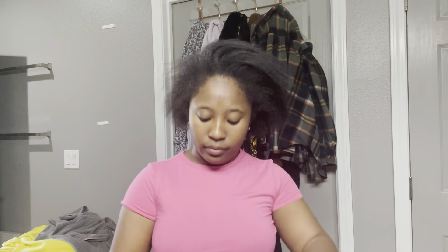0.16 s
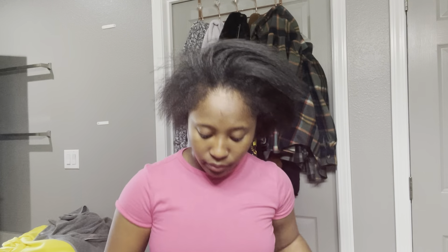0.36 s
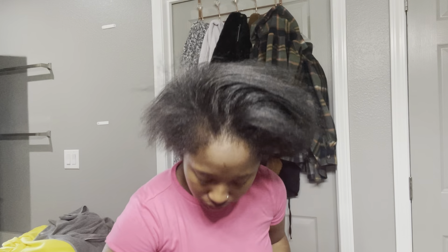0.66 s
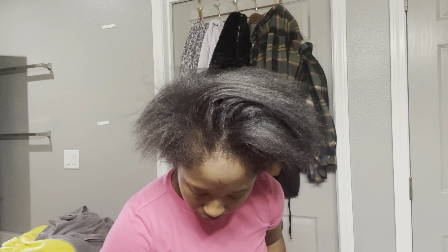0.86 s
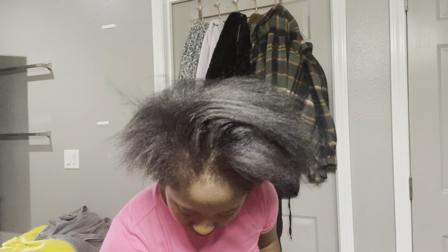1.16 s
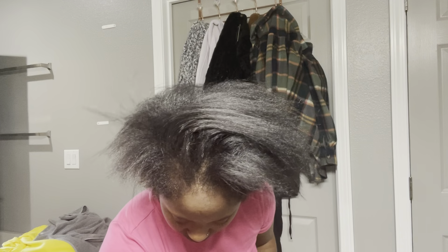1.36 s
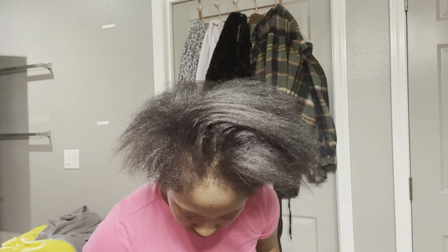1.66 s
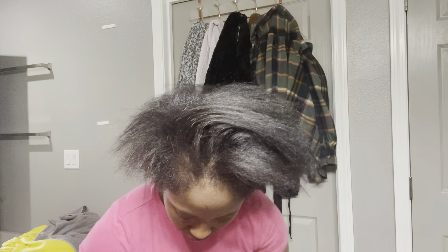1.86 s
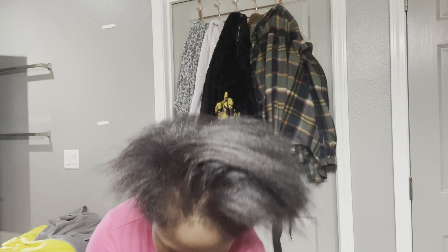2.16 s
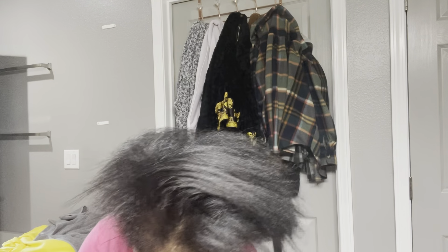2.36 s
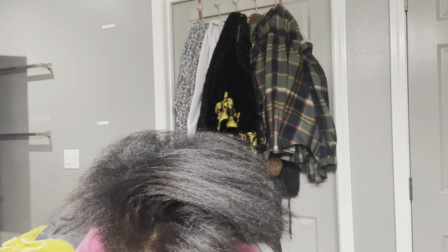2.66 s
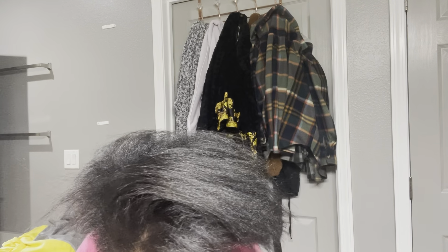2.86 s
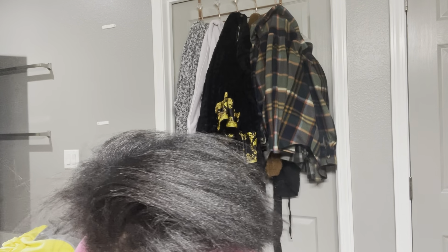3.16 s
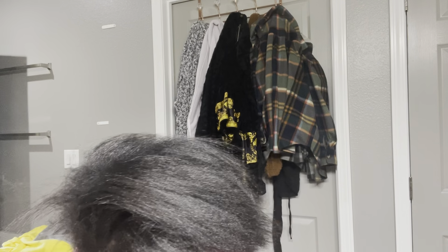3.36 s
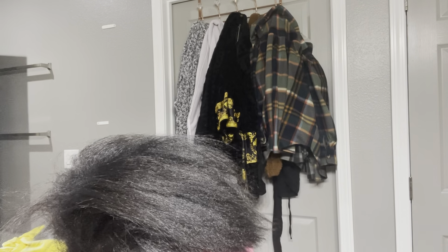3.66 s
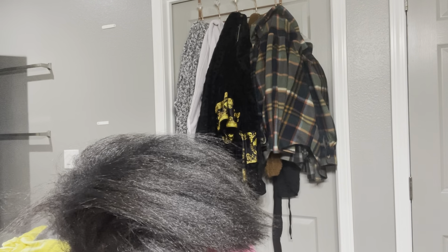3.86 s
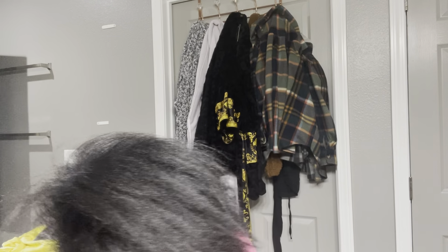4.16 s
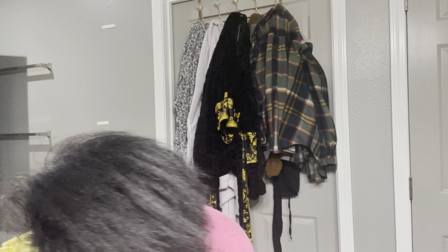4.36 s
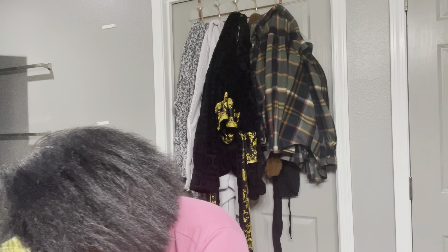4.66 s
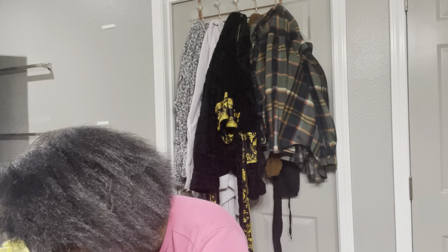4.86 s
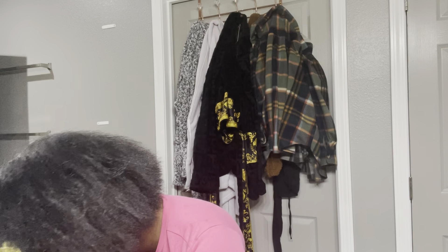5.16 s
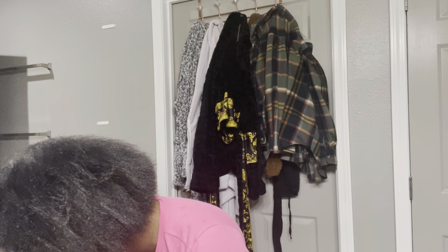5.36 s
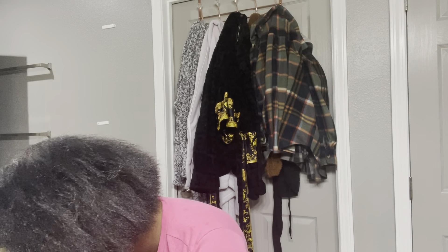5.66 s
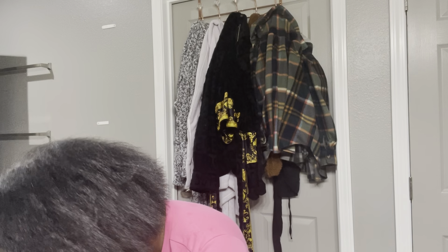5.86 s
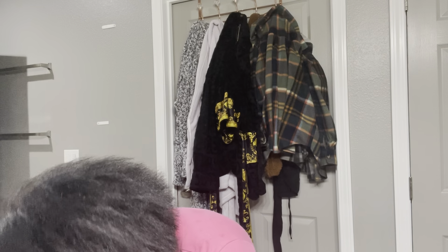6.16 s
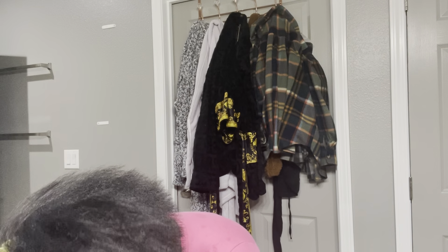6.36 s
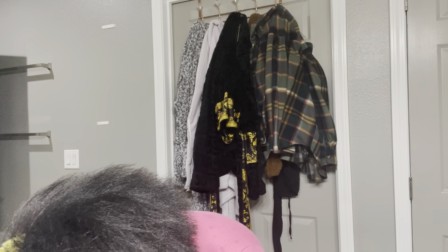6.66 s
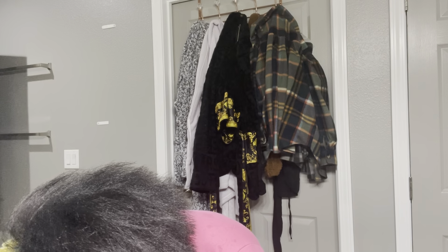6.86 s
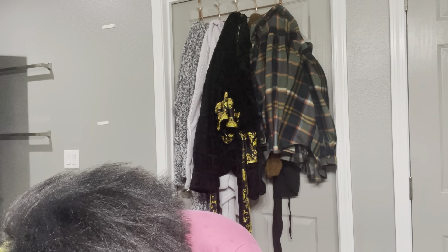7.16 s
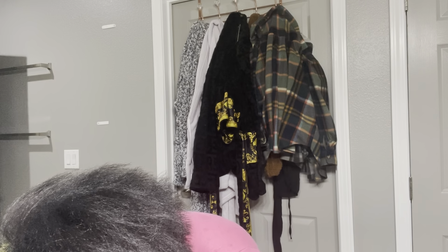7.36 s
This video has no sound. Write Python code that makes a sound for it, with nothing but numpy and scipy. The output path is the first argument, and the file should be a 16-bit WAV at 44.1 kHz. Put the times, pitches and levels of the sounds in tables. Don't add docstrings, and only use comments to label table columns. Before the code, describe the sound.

Indoor handling noise, heard close on a phone: padded bumps, hard plastic clacks, tiny clip ticks, and gritty dragging along a shelf. It starts sparse and quiet, grows busier with a bright knock and a flurry of rattles, thins out, then a hollow object falls with a rapid triple bang. Lighter knocks, crisp clicks and rustling continue to the end over faint building rumble and hiss.

```python
import sys
import numpy as np
from scipy import signal
from scipy.fft import rfft, irfft
from scipy.io import wavfile
from scipy.ndimage import uniform_filter1d

SR = 44100
rng = np.random.default_rng(int(sys.argv[2]) if len(sys.argv) > 2 else 0)


def inscribe(sig):
    pcm = np.round(np.clip(np.atleast_2d(sig).T, -1, 1) * 32767)
    wavfile.write(sys.argv[1], SR, pcm.astype(np.int16))


def elevation(decibels):
    levels = np.asarray(decibels, float)
    return 10 ** (levels / 20)


N = 330750


def evened(x):
    return x / np.sqrt(np.mean(x ** 2) + 1e-20)


def read(points, hz):
    f, value = np.transpose(points)
    return np.interp(np.log(hz + 1), np.log(f + 1), value)


def add(mix, s, sound):
    part = mix[round(s * SR):][:len(sound)]
    part += sound[:len(part)]


# start in seconds, body peak in dB, thud in dB re body, brightness in dB.
BUMPS = [(.554, -48.5, -1, 6.5), (1.252, -40, 3.5, -13), (2.198, -35.5, -10, 3.5), (2.276, -33, -16, 2),
         (3.127, -38.5, 4.5, -2.5), (3.272, -55, -8, -1), (3.496, -35, -19, -2), (4.547, -44, -29, -5),
         (5.041, -43, 7.5, -16), (5.072, -43, 9, -7), (5.098, -38.5, 1, -3), (5.968, -19.5, -3, -3.5),
         (6.274, -36, -3, 3.5), (6.913, -40, 7, 0.5), (6.971, -34.5, -20, -6.5), (7.03, -27.5, -1, -2.5),
         (7.235, -29.5, -25, -12.5)]
# start in seconds, body peak in dB, thud in dB re body, brightness in dB.
CLACKS = [(.653, -45.5, -17, -6), (.729, -23.5, -48, -11), (2.049, -35.5, -2.5, 0.5), (2.41, -45, -17, 6.5),
          (2.45, -17.5, -13, -11.5), (2.484, -28, -33, -4), (3.293, -41, 11.5, 3), (3.337, -28, -2.5, -9),
          (3.398, -25.5, -16, -5.5), (3.479, -43, -12, 9), (3.541, -37, 4, -5), (3.585, -32.5, 6, 3),
          (4.003, -48.5, -28, 4), (4.134, -41, -5, -1.5), (4.183, -33.5, 1, 2), (4.379, -47, -23, -19),
          (4.753, -35, 0, -33), (4.768, -30.5, 1.5, -65), (4.856, -45, 0, 3.5), (4.878, -37.5, 9.5, 2.5),
          (5.312, -36.5, 1, -13), (5.343, -54, 10, -29), (5.907, -41, 9.5, -9.5), (6.266, -41, 14, 4.5),
          (6.315, -34, -30, 0), (6.346, -34.5, 3, 2.5), (6.999, -39, -17, 1), (7.079, -31, -5, -3),
          (7.209, -40, -21, -2)]
# start in seconds, body peak in dB, thud in dB, brightness in dB.
TICKS = [(.517, -43.5, 7.5, 3.5), (.699, -49, 10, -1), (.805, -39, -45, -11), (1.644, -56, 20, -4),
         (2.158, -36.5, -4, 4), (2.397, -43.5, 4, 4.5), (2.641, -43, 8.5, -12), (2.769, -54, -21, 14),
         (2.882, -56, 11, 18), (3.1, -73, 12, -14), (3.67, -24, 0, 3), (4.058, -49.5, -1, 6.5),
         (4.159, -49, 13, 10), (4.456, -52, 16, 13), (5.95, -25.5, -51, 0.5), (6.394, -36.5, 10, -3),
         (6.419, -29, -20, 4), (6.478, -25.5, 0, 0), (6.701, -39, 2, 9), (6.734, -30, -15, -4.5),
         (6.879, -43.5, 3, 1.5), (7.427, -51.5, -45, 2.5)]
# start in seconds, body peak in dB, thud in dB re body, brightness in dB.
DROP = [
    (5.362, -28.5, 14, -23),
    (5.391, -9.5, 0.5, -13),
    (5.455, -10.5, -33, -13),
    (5.483, -11.5, 5, -4.5),
    (5.545, -30, 7, -26),
]


def blows():
    kinds = ((BUMPS, 0, -9.5, 0.37), (CLACKS, 0, -3.5, 0.54), (TICKS, -7.5, 0, 0.46), (DROP, 0, -10, 0.58))
    found = []
    for rows, clack, tick, near in kinds:
        for s, db, thud, bright in rows:
            found.append((s, db, thud, bright + clack, bright + tick, near))
    return sorted(found)


CONTACT_S = [0.014, 0.011, 0.0004, 0.0033]
LATE_S = [0.0024, -.0015, -.0003, .0006]
NEAR_DB = [-14, -13.5, -9, -9.5]


def knocks():
    drive = np.zeros((2, 3, 4, N))
    events, t = blows(), np.arange(1500) / SR
    chance = rng.standard_normal((len(events), 4, len(t)))
    for k, (s, db, thud, clack, tick, near) in enumerate(events):
        for b, rel_db in enumerate((thud, 0, clack, tick)):
            blow = chance[k, b] * np.exp(-t / CONTACT_S[b])
            blow[0] = 1.18 * np.linalg.norm(blow)
            blow *= elevation(db + rel_db - 8.5) / np.linalg.norm(blow)
            add(drive[0, k % 3, b], s + LATE_S[b], elevation(20.0 * near + NEAR_DB[b]) * blow)
            add(drive[1, k % 3, b], s + LATE_S[b], blow)
    return drive


# start in seconds, clack in dB, tick in dB.
SNAPS = [(0.516, -54, -61), (1.257, -60, -66), (1.45, -56, -70), (2.057, -36, -54), (2.075, -42, -56),
         (2.162, -40, -36), (2.2, -51, -47), (2.277, -35, -43), (2.292, -50, -52), (2.345, -43, -58),
         (2.772, -68, -36), (2.883, -48, -57), (3.102, -68, -48), (3.281, -44, -60), (3.295, -52, -45),
         (3.324, -44, -52), (3.342, -38, -46), (3.369, -32, -46), (3.496, -34, -52), (3.535, -28, -51),
         (3.545, -39, -38), (3.569, -40, -44), (3.587, -37, -42), (3.61, -43, -59), (3.672, -26, -28),
         (5.395, -19, -36), (5.457, -21, -34), (5.484, -19.5, -45), (5.488, -17.5, -31), (5.499, -26, -47),
         (5.511, -32, -48), (5.951, -38, -44), (6.274, -42, -41), (6.317, -48, -52), (6.349, -42, -35),
         (6.414, -48, -24), (6.422, -35, -27), (6.432, -29, -46), (6.441, -28, -44), (6.634, -39, -56),
         (6.703, -47, -40), (6.722, -50, -52), (6.74, -40, -50), (6.953, -49, -61), (7.0, -49, -50),
         (7.036, -45, -44), (7.082, -41, -48), (7.237, -33.5, -55)]


def snaps():
    drive = np.zeros((2, 3, 4, N))
    path_db = [-14, -12.5]
    for k, (s, clack_db, tick_db) in enumerate(SNAPS):
        drive[:, k % 3, 2:, round(s * SR)] = elevation(np.add.outer(path_db, [clack_db, tick_db]))
    return drive


def rattles(clicks):
    direct_db, chatter_s = 16, 0.0024
    out, t = np.zeros((2, 2, N)), np.arange(600) / SR
    swell = t / chatter_s * np.exp(-2 * t / chatter_s)
    chance = rng.standard_normal((len(SNAPS), 2, len(t)))
    for (s, clack_db, tick_db), chatter in zip(SNAPS, chance):
        chatter = chatter * swell
        chatter = chatter / np.linalg.norm(chatter[0])
        bands = elevation([[[clack_db]], [[tick_db]]]) * chatter
        add(out.T, s - .001, bands.T)
    coloured = rfft(out) * rfft(clicks[2:, None], N)
    return elevation(direct_db) * irfft(coloured.sum(0), N)


def strokes(rows):
    fade_db, rise_share = 21, 0.85
    t, power = np.arange(0, N, 64) / SR, 0
    for s, db, upper_db, fade_s in rows:
        away = np.maximum(t - s, (s - t) / rise_share) / fade_s
        peak_db = np.array([[db], [db + upper_db]]) - 6.5
        power = power + elevation(peak_db - fade_db * away) ** 2
    return [np.interp(np.arange(N) / SR, t, np.sqrt(band)) for band in power]


# peak in seconds, thud in dB, body in dB re thud, fade in seconds.
DRAGS = [(.3, -72.5, -11, 0.72), (.72, -64, 12, 0.14), (.85, -55, -13, 0.2), (1.42, -46, -6.5, 0.21),
         (1.7, -57, -25, 0.6), (1.85, -62, 13, 0.092), (1.95, -62.5, 16, .1), (2.23, -53.5, 15.5, 0.29),
         (2.57, -30.5, -7.5, 0.17), (2.84, -57, 2, 0.48), (3.2, -60, -12, 0.45), (3.34, -51.5, 18, 0.12),
         (3.5, -39, -6, .3), (3.65, -39.5, 6, 0.19), (3.8, -47, 5.5, 0.36), (4.18, -34.5, -0.5, 0.27),
         (4.4, -51.5, 1.5, 1), (4.82, -43.5, -3.5, 0.45), (5.1, -61.5, 15, 0.27), (5.37, -32, -13, 0.18),
         (5.51, -26, -19, 0.072), (5.64, -44.5, 8, 0.33), (6.05, -51.5, -3.5, 0.1), (6.33, -43, -10, 0.24),
         (6.45, -36.5, 4.5, 0.39), (6.6, -37.5, -14, 1), (6.73, -30.5, -4, 0.34), (6.9, -48, 1.5, 0.41),
         (7.12, -33, -10, 0.31), (7.19, -41.5, 3, 0.15)]
# peak in seconds, clack in dB, tick in dB re clack, fade in seconds.
RUSTLES = [(.48, -78, 14, 0.09), (.75, -39, -38, 0.091), (1.42, -57.5, -1, 0.26), (1.94, -53.5, 0, 0.15),
           (2.09, -35, -13, 0.064), (2.32, -59, 11.5, 0.17), (2.46, -44, -24, 0.086),
           (2.84, -51, 5.5, 0.095), (2.98, -51.5, 1.5, 0.13), (3.2, -58, 9, 0.18), (3.34, -32.5, 1, 0.13),
           (3.55, -29.5, 1, 0.08), (3.68, -30.5, -26, 0.11), (4.05, -55.5, 6.5, 0.14),
           (4.18, -36.5, -43, 0.14), (4.6, -58, 1.5, 0.99), (4.95, -43, -6.5, 0.24),
           (5.16, -51.5, -8, 0.49), (5.64, -50, -18, 0.1), (5.74, -54.5, -0.5, 0.48),
           (6.33, -38, -40, 0.11), (6.45, -33.5, -16, 0.18), (6.6, -42.5, 1, 0.79), (6.73, -39, 0, 0.1),
           (6.95, -50, 2, 0.24), (7.12, -37, -3, 0.15), (7.2, -43, 0, 0.13)]


def rubbing():
    slip_now = rng.random((3, 1, N)) < 500 / SR
    size = elevation(7.45 * np.minimum(rng.exponential(1, (3, 1, N)), 3.2)) * slip_now
    grain = signal.lfilter([1], [1, -.9], size)
    slips = evened(grain * rng.standard_normal((3, 4, N)))
    stroke = np.array(strokes(DRAGS) + strokes(RUSTLES))
    return slips * stroke / np.sqrt(3 * 0.03 * SR)


# start in seconds, level in dB.
PANEL = [(2.196, -38.5), (3.587, -30.5), (4.184, -43), (4.774, -36.5), (5.332, -34.5), (5.484, -38),
         (6.393, -30.5), (6.472, -25), (6.735, -47)]
# start in seconds, level in dB, pitch in Hz.
BOXES = [(.53, -47, 300), (.73, -37, 260), (.791, -38, 275), (2.199, -43.5, 249), (3.362, -39, 249),
         (4.185, -35.5, 266), (4.767, -41, 345), (4.88, -40, 250), (5.39, -27, 226), (5.393, -16.5, 118.5),
         (5.483, -21, 240.5), (5.485, -22.5, 190), (5.399, -24.5, 168), (5.545, -28, 199),
         (5.968, -29, 261.3), (6.033, -37, 239), (6.478, -32.5, 201.3), (6.736, -39, 254),
         (7.081, -39, 241.5)]
# start in seconds, level in dB, pitch in Hz, t60 in seconds.
SHELLS = [(.53, -53, 490, 0.13), (.732, -45, 476, 0.16), (.734, -40.5, 890, 0.19),
          (.734, -42.5, 1440, 0.14), (.734, -44.5, 1653, 0.18), (.734, -53, 2400, 0.068),
          (1.255, -60, 1646, 0.095), (1.255, -72, 2300, .15), (2.158, -40.5, 950, 0.055),
          (2.278, -39.5, 1747, .04), (2.3, -40.5, 700, 0.048), (2.411, -46, 2950, .04),
          (2.06, -45.5, 203, 0.26), (3.135, -56, 224, 0.18), (4.62, -52, 200, 0.18), (.52, -63, 2220, .12),
          (5.975, -31.5, 1384, 0.15), (5.975, -38, 1927, .1), (4.2, -49, 640, .3), (1.26, -62.5, 492, 0.33),
          (2.449, -22.5, 1030, 0.042), (2.452, -30.5, 2120, 0.051), (2.455, -31.5, 585, 0.19),
          (3.339, -34, 676, 0.15), (3.497, -37.5, 500, 0.16), (3.541, -33, 1255, 0.052),
          (3.576, -35.5, 1820, 0.052), (3.67, -27.5, 995, 0.025), (3.67, -30, 1910, 0.02),
          (4.77, -39.5, 643, 0.16), (5.394, -22.5, 1666, 0.036), (5.456, -11.5, 620, 0.031),
          (5.484, -18.5, 379, 0.18), (5.484, -14, 660, 0.06), (5.485, -26, 894, 0.084),
          (5.484, -40, 1770, 0.087), (5.486, -36, 2683, 0.16), (5.487, -34, 4400, 0.036),
          (5.396, -33, 2300, .06), (5.5, -27.5, 500, 0.17), (6.705, -48, 5630, 0.084),
          (3.545, -46, 7080, .1), (5.974, -35, 1715, 0.097), (5.974, -29, 1095, 0.099),
          (6.274, -23, 1100, 0.014), (6.275, -36, 487, 0.4), (6.421, -26, 7330, 0.035),
          (7.081, -39, 1770, 0.089), (6.741, -37, 892, 0.15), (7.235, -43.5, 509, 0.16)]


def rings():
    panel_hz, panel_t60_s, box_t60_s = 114.5, 0.098, 0.16
    detune = 1.014
    struck = [(*row, panel_hz, panel_t60_s) for row in PANEL]
    struck += [(*row, box_t60_s) for row in BOXES] + SHELLS
    out, t = np.zeros((2, N)), np.arange(SR // 2) / SR
    for s, db, mode_hz, t60 in struck:
        for path, turn, hz in zip(out, (0, np.pi / 2), (mode_hz, mode_hz * detune)):
            tone = np.sin(2 * np.pi * hz * t + turn)
            neighbour = 0.15 * np.sin(2 * np.pi * 1.2 * hz * t - turn)
            swell = 1 - np.exp(-t * hz / 0.65)
            add(path, s, elevation(db + 9.0 - 60 * t / t60) * swell * (tone + neighbour))
    return out


# lower edge in Hz, upper edge in Hz.
BANDS_HZ = [
    (40, 300),
    (300, 1100),
    (1100, 4200),
    (4200, 16000),
]
# frequency in Hz, level in dB per Hz.
COLOUR = [(40, -48), (75, -11.5), (98, -2.5), (118, 1), (150, -9), (250, -1.5), (370, -12), (500, -6),
          (600, -7.5), (1000, -8.5), (1700, -16), (3000, -17.5), (5000, -19.5), (8500, -14), (11500, -20.5),
          (16000, -32)]


def band_click(lo, hi):
    hz = abs(np.fft.fftfreq(4096, 1 / SR)) + 1
    gain = elevation(read(COLOUR, hz)) / (1 + (lo / hz) ** 4) / (1 + (hz / hi) ** 4)
    spectrum = np.exp(np.conj(signal.hilbert(np.log(gain + 1e-6))))
    click = np.fft.ifft(spectrum).real[:2048]
    return click / np.linalg.norm(click)


# frequency in Hz, t60 in seconds.
WALLS = [(100, 0.33), (260, 0.38), (700, 0.45), (1840, 0.48), (4850, 0.48), (10000, 0.37), (13500, 0.21)]
# frequency in Hz, level in dB, t60 in seconds.
STANDING = [(119.5, -5, 0.4), (160.9, -13.5, 0.48), (204, -11, 0.48), (252.4, -2, 0.18), (300, -7, 0.61),
            (345, -1.5, 0.89), (385, -33, 0.23), (500, -2, 0.92), (585, -4, 0.067), (660, -43, 0.71),
            (763.3, -6, 0.64), (890, -3.5, 0.27), (995, -4, 1), (1100, 3, 0.17), (1507, -0.5, 0.099),
            (1715, 4, 0.56), (2120, -29, 0.1)]


def room_paths():
    t = np.arange(SR * 3 // 4) / SR
    _, frames, z = signal.stft(rng.standard_normal((2, len(t))), SR, nperseg=256)
    hz = np.fft.rfftfreq(256, 1 / SR)
    decay = elevation(-60 * frames / read(WALLS, hz)[:, None])
    tail = signal.istft(z * decay, SR, nperseg=256)[1][:, :len(t)]
    for f, db, t60 in STANDING:
        t60 = min(t60, .42)
        beat = 1 + .6 * np.sin(2 * np.pi * .017 * f * t)
        wave = np.sin(2 * np.pi * (f * t + rng.random((2, 1))))
        tail += 0.078 * beat * elevation(db - 60 * t / t60) * wave
    slap = 0.19 * np.exp(-((t - .036) / 0.011) ** 2)
    near = (2.32 * np.exp(-t / 0.0029) + slap) * (1 - np.exp(-(t / 0.00063) ** 2))
    far = 0.79 * (1 - np.exp(-t / 0.0055))
    return tail * near, tail * far


# frequency in Hz, level in dB per Hz.
HUSH = [(15, -39), (25, -24), (64, -1.5), (123, -8), (263, -27.5), (361, -24), (456, -32), (1480, -38.5),
        (4560, -47.5), (8330, -41.5), (9010, -23), (10000, -37.5), (13000, -48), (15000, -52)]
# frequency in Hz, level in dB.
HUM = [
    (76, -90),
    (120, -65.5),
]
# time in seconds, level in dB.
SWELL = [(0.0, -52), (.31, -56), (.85, -44), (1.17, -58), (2.53, -42.5), (3.05, -50.5), (3.55, -42.5),
         (3.93, -53), (4.22, -50.5), (5.45, -48), (6.23, -48), (6.58, -46), (7.31, -51.5), (7.5, -59)]


def hush():
    hz, t = np.fft.rfftfreq(N, 1 / SR), np.arange(N) / SR
    noise = rfft(rng.standard_normal((2, N))) * elevation(read(HUSH, hz))
    out = elevation(-64.5) * evened(irfft(noise, N))
    for f, db in HUM:
        drift = uniform_filter1d(rng.standard_normal(N), 3000)
        waver = evened(uniform_filter1d(drift, 3000))
        out[0] += elevation(db - 0.5 + 1.2 * waver) * np.sin(2 * np.pi * f * t)
    low = irfft(rfft(out) / (1 + (hz / 300) ** 4), N)
    swell = elevation(np.interp(t, *np.transpose(SWELL)) + 57.5)
    return out - low + low * swell


def scene():
    rumble_cut_hz, earlier_s, earlier_db = 56, 0.045, -56.5
    clicks = np.array([band_click(*band) for band in BANDS_HZ])
    drive = knocks() + snaps() + rubbing()
    handling = irfft((rfft(drive) * rfft(clicks, N)).sum(2), N)
    out = rings()
    handling[1, 0] += 0.018 * out[0]
    for spot in range(3):
        for sound, paths in zip(handling[:, spot], room_paths()):
            out += signal.oaconvolve(sound[None], paths, axes=1)[:, :N]
    out = signal.sosfilt(signal.butter(2, rumble_cut_hz, "high", fs=SR, output="sos"), out)
    tick = clicks[None, 3] + 0.27 * clicks[2]
    earlier = signal.oaconvolve(tick, paths, axes=1)[:, round(earlier_s * SR):]
    add(out.T, 0, elevation(earlier_db) * earlier.T)
    return out + hush() + rattles(clicks)


def band_limit(x):
    return signal.sosfilt(signal.butter(12, 16470, fs=SR, output="sos"), x)


# frequency in Hz, likeness 0-1.
LIKE = [(30, .82), (70, .99), (120, .985), (200, .88), (350, .45), (550, .18), (5500, .15), (7750, .82),
        (8350, .988), (9250, .988), (10000, .88), (11500, .975), (12900, .6), (13800, .92), (16000, .6)]
# frequency in Hz, lag in radians.
LAG = [(5500, 0), (6900, 1.6), (8350, 2.98), (9250, 3.36), (10300, 4.85), (11200, 6.1), (12060, 6.4),
       (13780, 9.4), (14640, 9.6), (16000, 11)]


def record(dry):
    hz, (left, other) = np.fft.rfftfreq(N, 1 / SR), rfft(dry)
    like = np.clip(read(LIKE, hz), 0, 1)
    shared = like * left * np.exp(-1j * read(LAG, hz))
    right = shared + np.sqrt(1 - like ** 2) * other
    edge = 0.39 + 0.64 / (1 + (hz / 11770) ** 30)
    return band_limit(irfft(np.array([left, right]) * edge, N))


dry = scene()
out = record(dry)
inscribe(out)
```